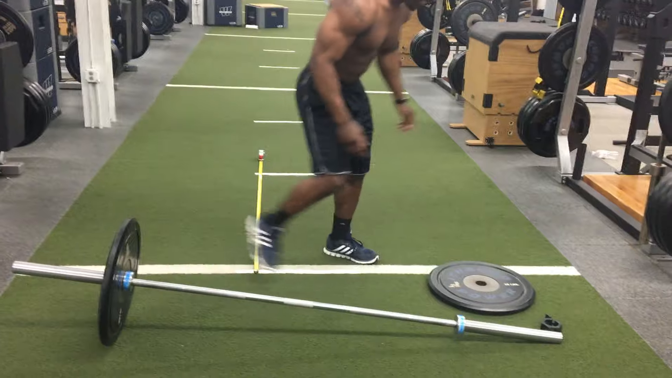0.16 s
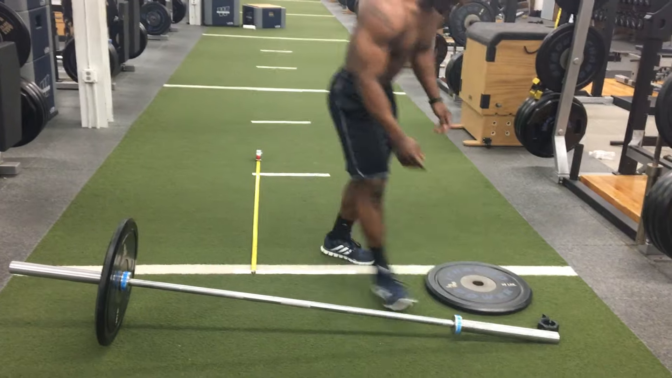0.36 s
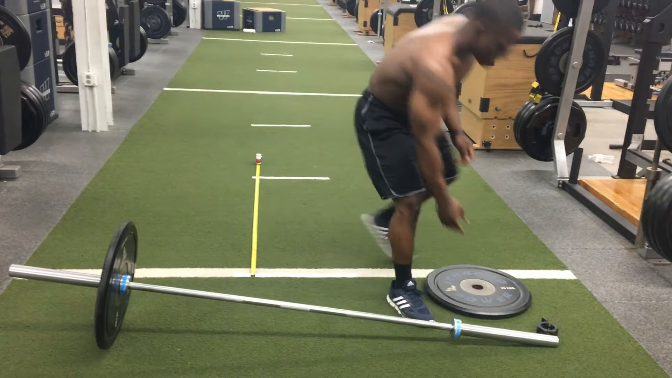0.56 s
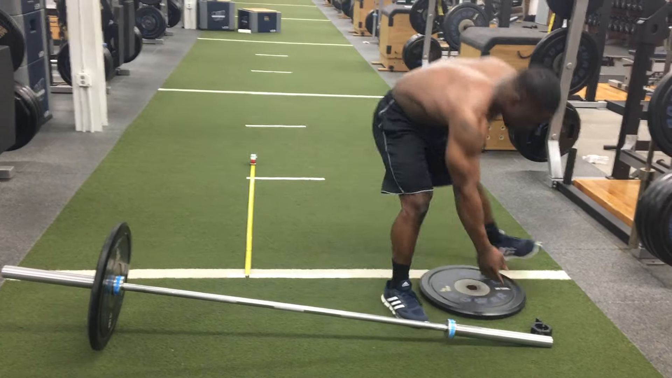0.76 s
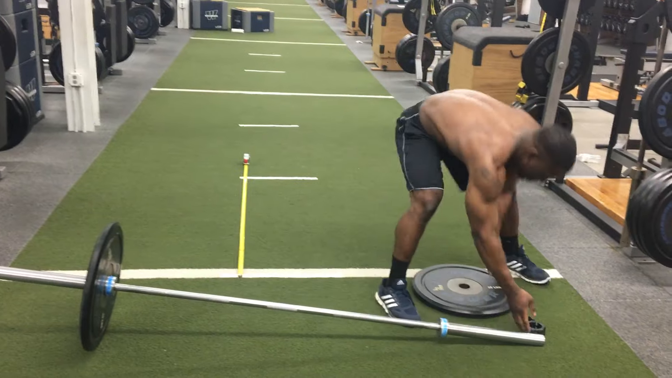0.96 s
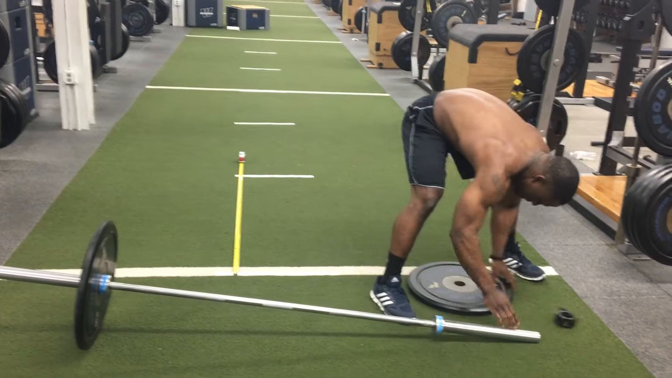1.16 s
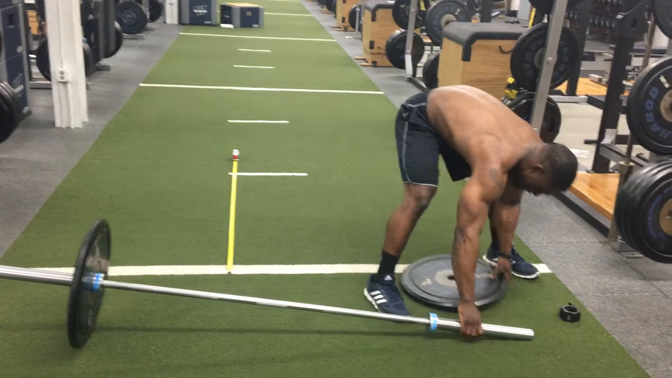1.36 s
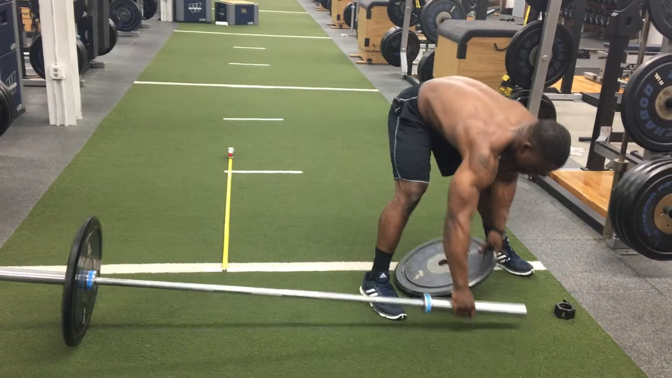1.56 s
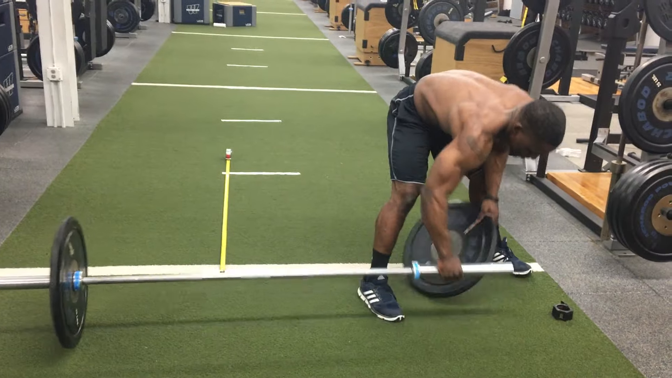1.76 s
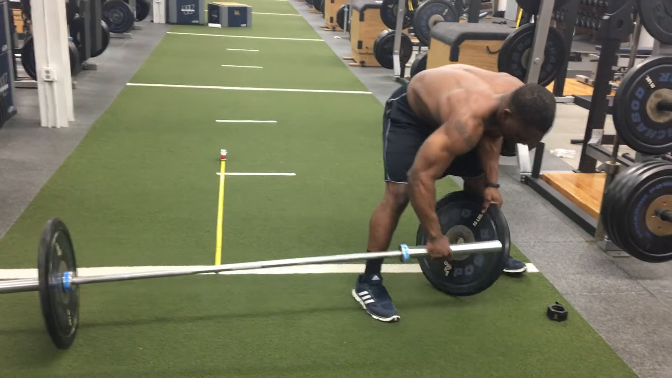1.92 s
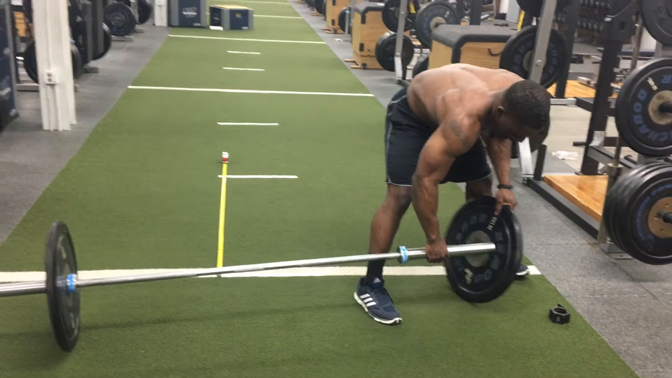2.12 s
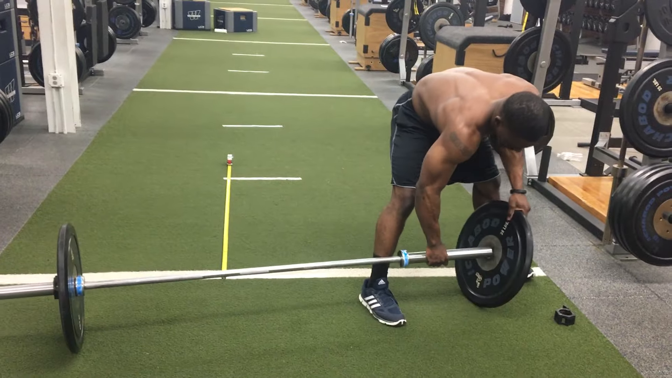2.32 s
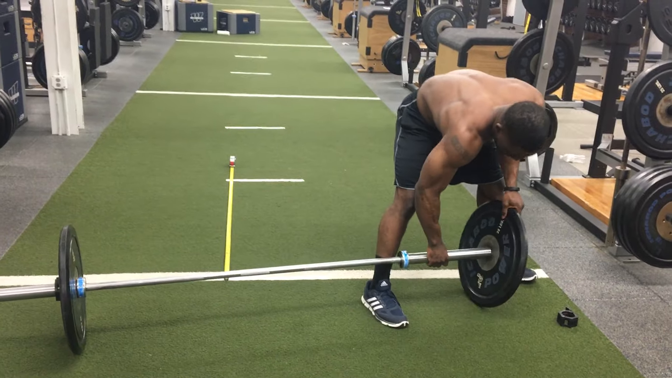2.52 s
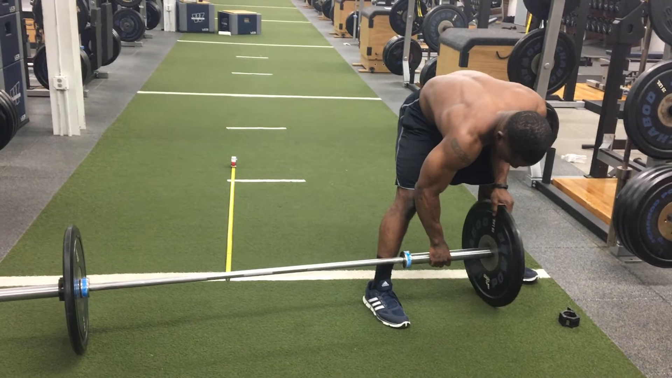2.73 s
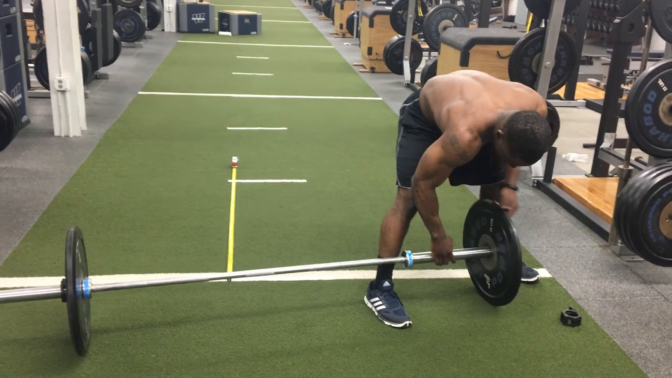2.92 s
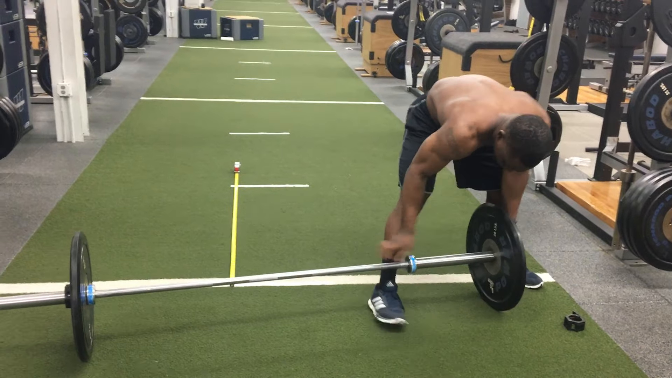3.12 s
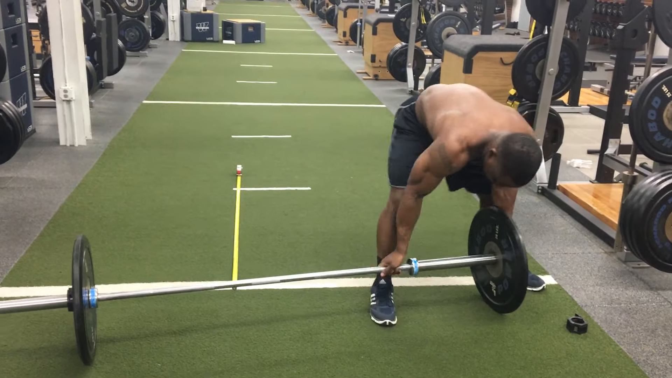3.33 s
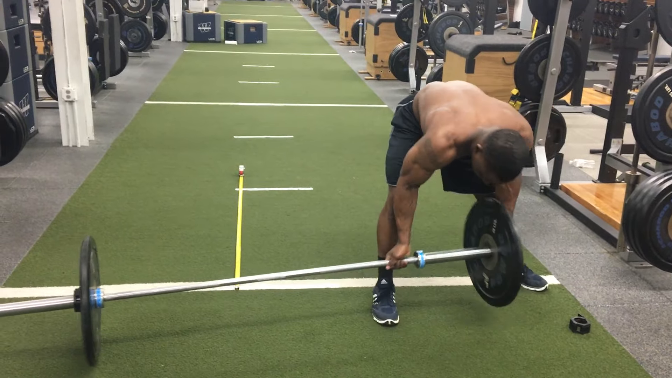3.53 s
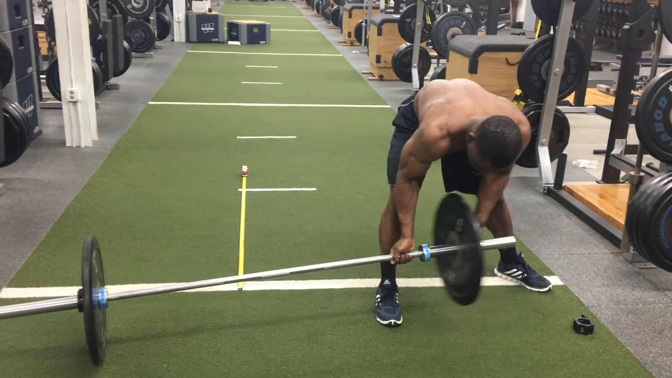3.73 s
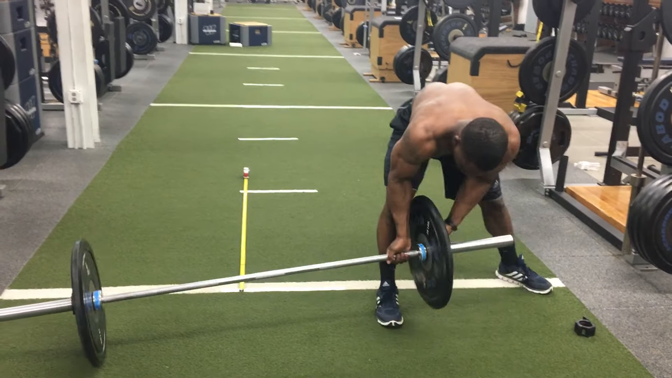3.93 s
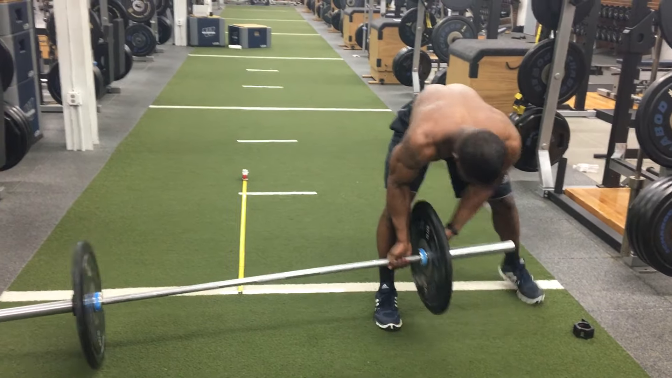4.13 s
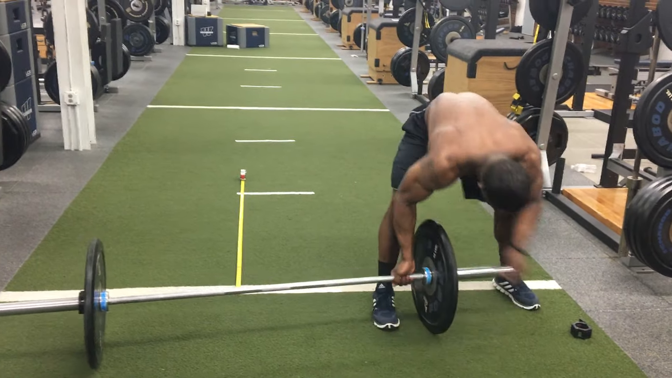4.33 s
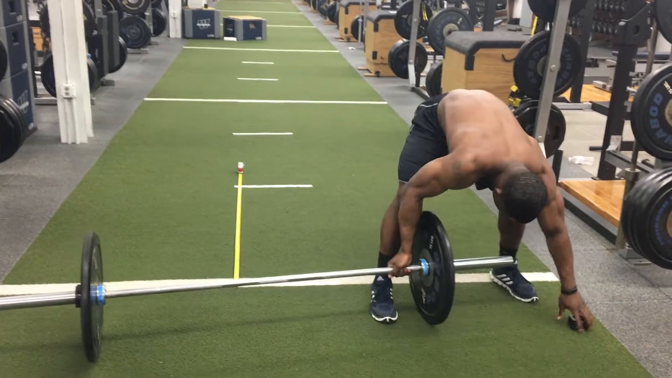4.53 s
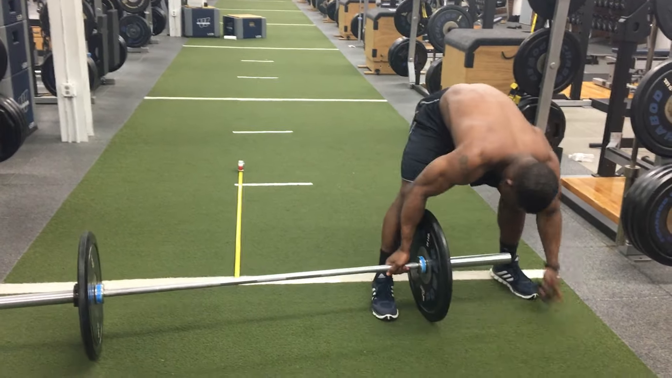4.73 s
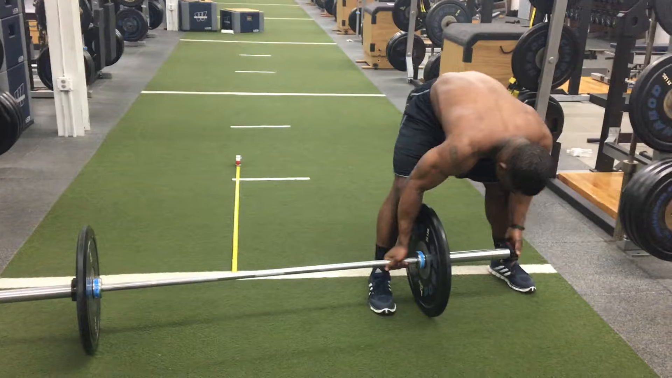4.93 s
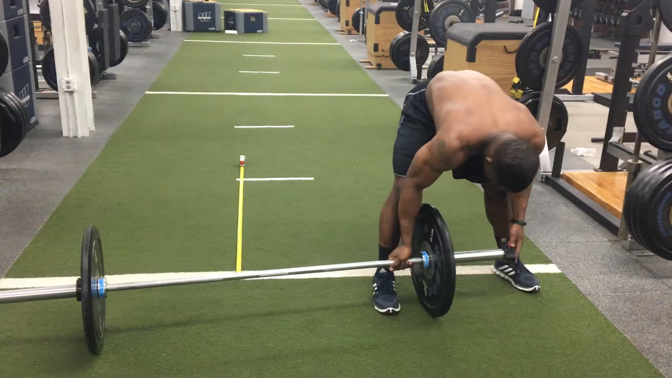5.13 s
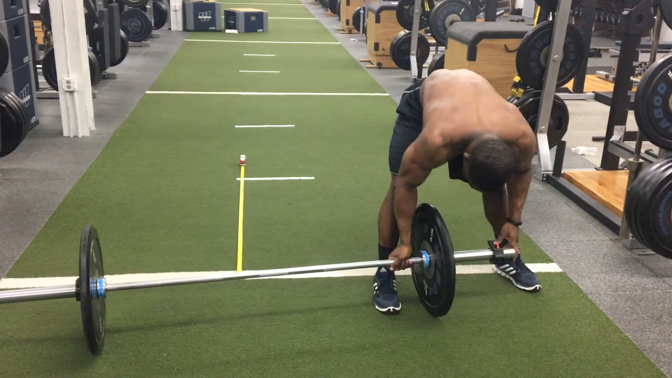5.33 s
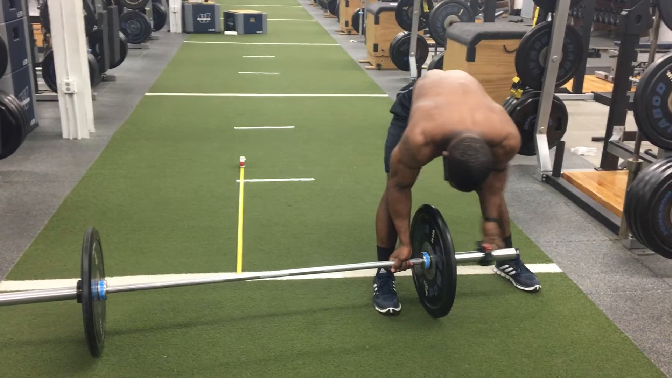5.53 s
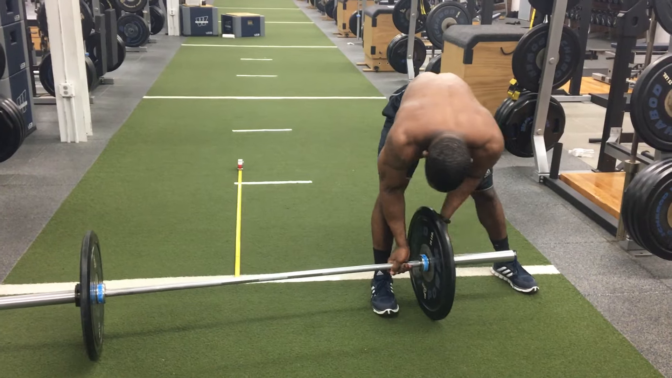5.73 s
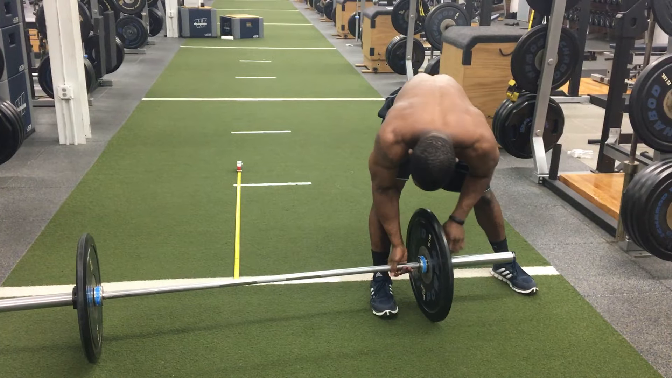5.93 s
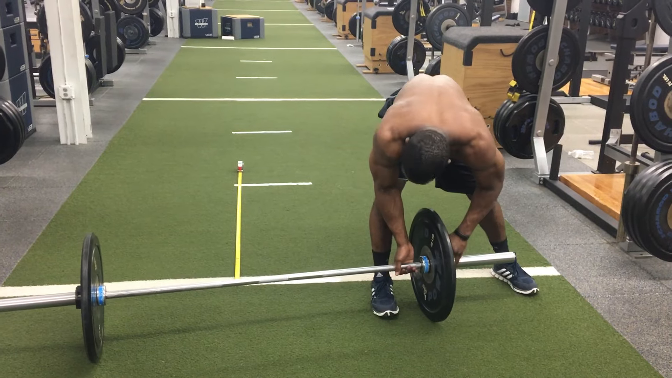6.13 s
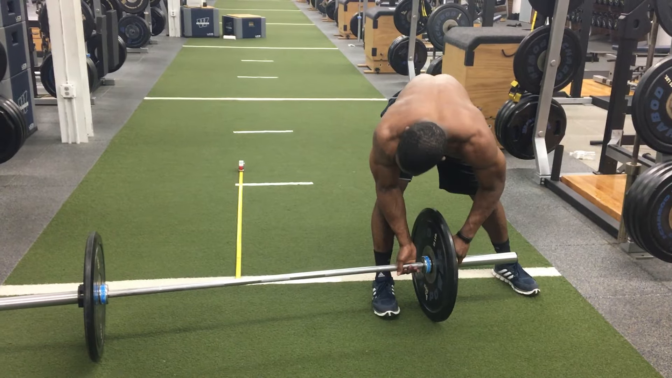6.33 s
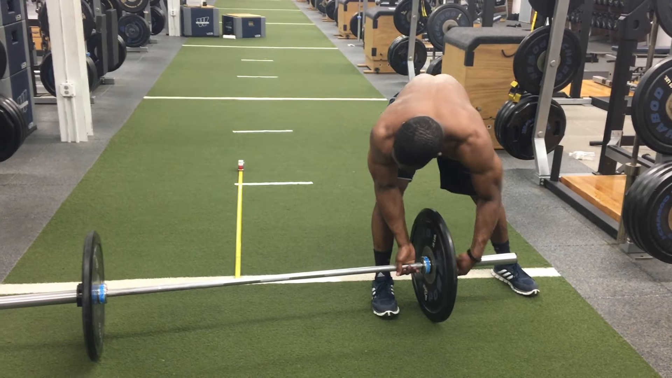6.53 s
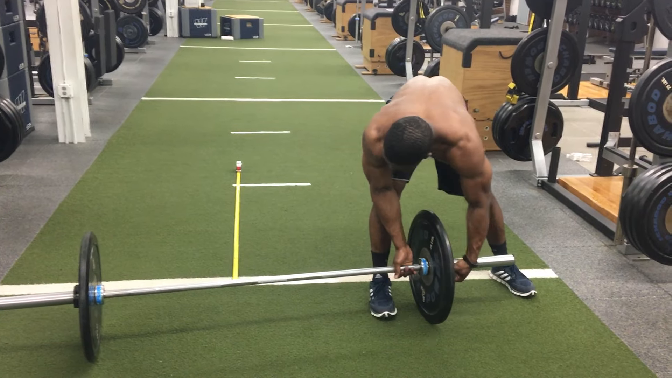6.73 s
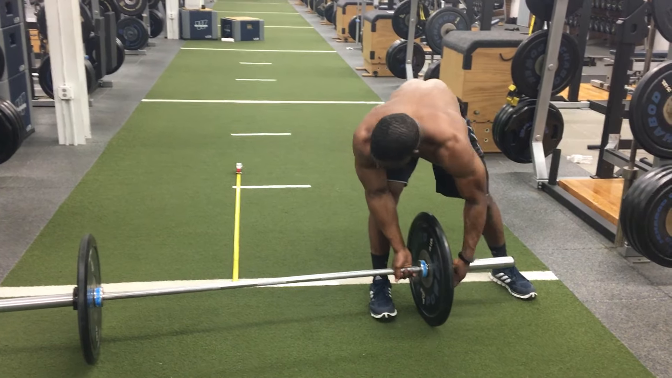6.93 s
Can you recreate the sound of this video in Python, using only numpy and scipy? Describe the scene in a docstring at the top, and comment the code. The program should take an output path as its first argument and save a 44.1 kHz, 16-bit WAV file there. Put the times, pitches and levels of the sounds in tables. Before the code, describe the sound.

Metal clanks and a brief squeal as a rubber plate slides onto a barbell, followed by plastic clicks in an echoing, humming gym.

```python
"""In a large gym with humming ventilation, a rubber weight plate is loaded on a steel barbell.
Its steel hub (the centre ring) knocks on the sleeve (the end of the bar), squeaks along it and slams
into the shoulder that stops it. Each blow cracks, rings the steel and thuds through the rubber.
A plastic collar then ticks onto the sleeve, slides up to the plate and is snapped shut.
The hall echoes these sounds."""
import sys
import numpy as np
from scipy import signal
from scipy.fft import rfft, irfft
from scipy.io import wavfile
from scipy.ndimage import uniform_filter1d

SR = 44100
rng = np.random.default_rng(int(sys.argv[2]) if len(sys.argv) > 2 else 0)


def file_out(sig):
    """Save sig as 16-bit WAV at sys.argv[1]."""
    # one column per channel
    cols = np.atleast_2d(sig).T
    # limit, then scale
    lim = np.clip(cols, -1, 1)
    pcm = np.round(lim * 32767).astype(np.int16)
    wavfile.write(sys.argv[1], SR, pcm)


N = 311434
T = np.arange(SR) / SR  # one second of sample times
PATHS = 3  # directions in which a blow spreads into the hall


def hub_slams():
    """The hub slams into the shoulder of the bar and bounces once."""
    # blows: start_s, level_db, brightness_hz, decay_s, thud_db, ring_db
    blows = [(3.9517, -15.5, 9000, .005, -6, -6), (3.9555, -16.5, 11000, .005, -7, -7),
             (4.0402, -28, 7000, .006, -8, 4.5)]
    # tone of the contact: frequency_hz, level_db
    colour = [(30, -76), (80, -3), (200, 0.5), (450, -6.5), (800, -3), (1350, 4.5), (2400, -3.5),
              (4300, -4), (6800, -6.5), (7800, -4.5), (10500, -12), (16000, -15)]
    # steel notes with the plate pushed home: pitch_hz, level_db, ring_s
    notes = [(1370, -10, .015), (1900, -6, .025), (2218, -13, .025), (3040, 4, .024), (4125, -13, .03),
             (4325, -13, .03), (5140, -13, .05), (5720, -12, .03), (6110, -14, .04), (7670, -14, .05),
             (7820, -16, .04), (8450, -20, .05), (10300, -24, .05)]
    return plate_blows(blows, colour, notes)


def hub_knocks():
    """The hub knocks on the sleeve; the rubber and the gripping hand soon stop the ringing."""
    # blows: start_s, level_db, brightness_hz, decay_s, thud_db, ring_db
    blows = [(2.2895, -26.5, 1570, 0.0018, -4.5, -15.5), (2.4425, -25.5, 2100, 0.0016, -16, -12),
             (2.4528, -28.5, 7500, 0.0058, -0.5, -2), (2.7475, -33, 1160, 0.0053, 3, -13),
             (2.7907, -37, 5030, 0.0076, -10, -11.5), (2.8376, -36.5, 8000, 0.0073, -16, -3),
             (2.889, -35.5, 3500, .0068, -6, -22), (2.9268, -41.5, 5860, 0.0035, -21, -6),
             (3.5435, -34, 11000, 0.004, -4.5, 2), (4.4275, -31.5, 5000, 0.015, -6, -12),
             (4.49, -34.5, 5470, 0.014, -3, -12)]
    # tone of the contact: frequency_hz, level_db
    colour = [(30, -63), (100, -39), (450, -12), (780, -8.5), (1000, -2), (1750, -4.5), (2200, -2.5),
              (2900, -3.5), (3400, -3.5), (5200, -12), (9000, -16.5), (16000, -24)]
    # steel notes of the sleeve: pitch_hz, level_db, ring_s
    notes = [(1809, -4, .03), (2471, -3, .04), (2724, -4, .04), (2900, 2, .04), (3914, -7, .04),
             (4350, -2, .04), (5150, -1, .08), (5280, -2, .08), (5645, -6, .04), (6115, -9, .05),
             (7100, -15, .05), (7617, -16, .07), (8155, -14, .05), (10050, -21, .06)]
    return plate_blows(blows, colour, notes)


def plate_blows(blows, colour, steel_notes):
    """Each blow makes a crack, a rubber thud and a steel ring, each leaving along its own path."""
    # low notes of the rubber: pitch_hz, level_db, ring_s
    rubber_notes = [(143, 2, 0.018), (224.4, 0, 0.036)]
    out = np.zeros((PATHS, N))
    for k, (start_s, db, bright_hz, decay_s, thud_db, ring_db) in enumerate(blows):
        add(out[k % PATHS], start_s, amp(db) * crack(colour, bright_hz, decay_s))
        add(out[(k + 1) % PATHS], start_s, amp(db + thud_db) * ring(rubber_notes))
        add(out[(k + 2) % PATHS], start_s, amp(db + ring_db) * ring(steel_notes))
    return out


def crack(colour, bright_hz, decay_s, size=4096):
    """Two surfaces chatter for a moment as they meet; a softer contact has less treble."""
    hz = abs(np.fft.fftfreq(size, 1 / SR))
    age = T[:size] / decay_s
    chatter = np.fft.fft(rng.standard_normal(size) * np.exp(-age) * (1 - np.exp(-age / 0.22)))
    chatter /= np.sqrt(uniform_filter1d(abs(chatter) ** 2, size=64, mode="wrap"))  # even out the tone
    log_gain = np.log(amp(read(colour, hz)) / np.sqrt(1 + (hz / bright_hz) ** 4))
    tone_filter = np.exp(np.conj(signal.hilbert(log_gain)))  # no sound comes before the hit
    fade = np.cos(np.linspace(0, np.pi / 2, size)) ** 2
    return unit_blow(np.fft.ifft(chatter * tone_filter).real * fade)


def ring(notes):
    """Notes fade by 60 dB in ring_s; each blow lands elsewhere and mixes them a little differently."""
    hz, db, ring_s = np.transpose(notes)[:, :, None]
    size = amp(db + rng.standard_normal(hz.shape))
    size[1::2] *= -1  # neighbouring notes swing against each other
    swing = np.sin(2 * np.pi * hz * T) * (1 - np.exp(-2 * hz * T))  # swells within a cycle
    return unit_blow((size * np.exp(-np.log(1000) * T / ring_s) * swing).sum(0))


def hub_squawk():
    """The hub breaks loose with one squawk."""
    # slip: peak_s, level_db, rise_s, fall_s
    slips = [(3.530, -15.5, 0.0018, 0.0042)]
    return squeak(slips, top_hz=1799, sag=0.019, harmonics_db=[-20.5, -2.5, -13.5, -28, -35, -49],
                  jitter=.022, flutter_db=1)


def hub_squeals():
    """The hub squeals in spurts along the sleeve."""
    # slips: peak_s, level_db, rise_s, fall_s
    slips = [(3.679, -23.5, 0.0038, 0.0045), (3.708, -41.5, 0.005, 0.032), (3.778, -47, .012, 0.039),
             (3.949, -48, .003, .002)]
    return squeak(slips, top_hz=5440, sag=0.0083, harmonics_db=[0, -27], jitter=.013, flutter_db=3)


def squeak(slips, top_hz, sag, harmonics_db, jitter, flutter_db):
    """Slipping steel squeaks; as the slip weakens, the pitch drops by up to the fraction sag."""
    strength = swells(slips)
    hz = top_hz * (1 - sag * (1 - strength / strength.max()))
    return strength * stick_slip(hz, harmonics_db, jitter, flutter_db)


def stick_slip(hz, harmonics_db, jitter, flutter_db):
    """Rapid sticking and slipping on steel makes a tone of unsteady pitch and strength."""
    cycles = np.cumsum(hz * (1 + jitter * wander(len(hz), rate_hz=900))) / SR
    tone = sum(amp(db) * np.sin(2 * np.pi * k * cycles) for k, db in enumerate(harmonics_db, 1))
    return unit_rms(tone) * amp(flutter_db * wander(len(hz), rate_hz=150))


def collar_clicks():
    """The plastic collar ticks against the sleeve and the plate."""
    # clicks: start_s, level_db, brightness_hz
    clicks = [(5.001, -42, 8500), (5.0088, -39.5, 10600), (5.0583, -44.5, 4300), (5.2294, -45, 16000),
              (5.2748, -46, 8600), (5.3337, -49, 5900), (5.4249, -53.5, 7000), (5.7775, -32.5, 9100),
              (5.7815, -30.5, 10100), (5.7858, -28, 12300), (5.7888, -24.5, 11200), (6.1722, -52, 8000)]
    # tone of the plastic: frequency_hz, level_db
    colour = [(100, 1), (500, -12), (1700, -1), (2800, 0), (4200, 2), (5200, 0), (7300, 2), (11000, -2),
              (16000, -4)]
    return plastic_clicks(clicks, colour, decay_s=0.0025)


def collar_latch():
    """The collar's lever snaps shut."""
    # clicks: start_s, level_db, brightness_hz
    clicks = [(6.861, -38, 7000), (6.8647, -33.5, 7000)]
    # tone of the lever: frequency_hz, level_db
    colour = [(200, -18), (1800, -5.5), (2800, 1.5), (4300, 0), (5000, -6), (6800, 6), (8500, -6.5),
              (16000, -11)]
    return plastic_clicks(clicks, colour, decay_s=0.0011)


def plastic_clicks(clicks, colour, decay_s):
    """Plastic clicks without ringing; the clicks take the paths in turn."""
    out = np.zeros((PATHS, N))
    for k, (start_s, db, bright_hz) in enumerate(clicks):
        add(out[k % PATHS], start_s, amp(db) * crack(colour, bright_hz, decay_s))
    return out


def hub_rub(judder_db=4, grit_db=4):
    """Each shove drags steel over steel with a gritty hiss."""
    # tone of the hiss: frequency_hz, level_db
    colour = [(300, 2), (1500, 18), (3000, 4), (4300, 9), (5300, -6), (7000, -7), (14000, -12),
              (16000, -22)]
    # shoves: peak_s, level_db, rise_s, fall_s
    shoves = [(3.29, -55, .07, 0.1), (3.55, -45.5, 0.018, 0.1), (3.68, -52, 0.044, 0.045),
              (3.84, -52.5, 0.019, 0.12)]
    hiss = noise(colour) * swells(shoves)
    return hiss * amp(judder_db * wander(N, rate_hz=200) + grit_db * wander(N, rate_hz=1800))


def whistles():
    """Light sliding contact whistles faintly; the pitch glides with the speed."""
    # the hub twice, then the collar: start_s, length_s, first_pitch_hz, last_pitch_hz, level_db
    glides = [(3.685, .035, 14500, 13600, -60), (3.74, .15, 9500, 10100, -66),
              (5.675, 0.13, 6200, 10000, -66)]
    out = np.zeros(N)
    for start_s, length_s, first_hz, last_hz, db in glides:
        progress = np.arange(0, length_s, 1 / SR) / length_s
        hz = first_hz * (last_hz / first_hz) ** progress
        tone = stick_slip(hz, harmonics_db=[0], jitter=.028, flutter_db=5.5)
        add(out, start_s, amp(db) * np.sin(np.pi * progress) * tone)
    return out


def soft_floor(x, delay_s=.003, echo_db=-7, dull_hz=4000):
    """The soft floor adds one dull echo just after the direct sound."""
    out = x.copy()
    echo = amp(echo_db) * signal.lfilter(*signal.butter(1, dull_hz, fs=SR), x)
    add(out, delay_s, echo)
    return out


def hall(x, build_s=0.0064, early_s=0.062):
    """Nearby racks scatter the sound first; then each frequency dies away at its own speed."""
    # tone of the echo: frequency_hz, level_db
    colour = [(80, -2), (220, 1), (450, 10), (1200, -2), (3000, -0.5), (6000, -4.5), (10000, -3.5),
              (16000, 1.5)]
    # time the echo takes to fade by 60 dB: frequency_hz, fade_s
    fade_times = [(100, 1.7), (220, 2.64), (500, 1.18), (1300, 1.91), (2800, 1.4), (5000, 0.88),
                  (8000, 0.68), (15000, 0.24)]
    t = np.arange(2 * SR) / SR
    echoes = rng.standard_normal(len(t)) * (rng.random(len(t)) < 5000 / SR)  # about 5000 a second
    hz, frame_s, bands = signal.stft(echoes, SR, nperseg=256)
    fade = np.exp(-np.log(1000) * frame_s / read(fade_times, hz)[:, None])
    bands = bands * amp(read(colour, hz))[:, None] * fade
    tail = signal.istft(bands, SR, nperseg=256)[1][:len(t)]
    tail *= (1 - np.exp(-t / build_s)) * (1 + np.exp(-t / early_s))  # builds up, strongest early on
    return signal.fftconvolve(x, tail / np.linalg.norm(tail))[:N]


def ventilation(waver=0.064, drift_hz=0.81):
    """Air rushes, the ducts rumble and the fan motors hum unsteadily."""
    # motor hum: pitch_hz, level_db
    motor_notes = [(119.9, -46.5), (164, -68), (240, -57), (285, -65.5), (327, -66.5)]
    # tone of the rushing air: frequency_hz, level_db
    air = [(150, -25), (270, 2), (480, -2), (700, 1), (1100, -0.5), (2000, -2), (3000, -7), (4100, -11),
           (5500, -16), (7700, -24), (10500, -28), (16000, -32.5)]
    # tone of the duct rumble: frequency_hz, level_db
    duct = [(20, -50), (36, -26), (43, 6), (49, -1), (56, -4.5), (72, -8.5), (100, -3.5), (130, -9),
            (200, -14), (300, -19), (600, -57)]
    hum = np.zeros(N)
    for hz, db in motor_notes:
        strength = amp(db) * (1 + waver * wander(N, rate_hz=14))
        pitch_hz = hz + drift_hz * wander(N, rate_hz=3.156)
        hum += strength * np.sin(2 * np.pi * np.cumsum(pitch_hz) / SR)
    return np.sqrt(2) * hum + amp(-49.5) * noise(air) + amp(-51) * noise(duct)


def swells(slips):
    """Strength of sliding: each slip grows to its peak and dies away."""
    t = np.arange(N) / SR
    strength = np.zeros(N)
    for peak_s, db, rise_s, fall_s in slips:
        from_peak = np.maximum((peak_s - t) / rise_s, (t - peak_s) / fall_s)
        strength += amp(db) * np.exp(-np.minimum(from_peak, 100))
    return strength


def noise(colour):
    """Steady noise with the given tone colour."""
    gain = amp(read(colour, np.fft.rfftfreq(N, 1 / SR)))
    return unit_rms(irfft(rfft(rng.standard_normal(N)) * gain, N))


def wander(count, rate_hz):
    """A random drift of about size 1."""
    points = rng.standard_normal(16384)
    return np.interp(np.arange(count) * rate_hz / SR, np.arange(len(points)), points)


def amp(db):
    """Turns decibels into a gain."""
    return 10 ** (np.asarray(db) / 20)


def unit_rms(x):
    """Scales a lasting sound to an average (rms) level of 1."""
    return x / np.sqrt(np.mean(x ** 2) + 1e-20)


def unit_blow(x):
    """Scales a blow to the energy of 10 ms at level 1."""
    return x * np.sqrt(SR / 100 / (np.sum(x ** 2) + 1e-20))


def read(points, hz):
    """Reads between a table's rows on a log-frequency scale."""
    row_hz, value = np.transpose(points)
    return np.interp(np.log(hz + 1), np.log(row_hz + 1), value)


def add(mix, start_s, sound):
    """Adds a sound to the mix at start_s."""
    part = mix[round(start_s * SR):][:len(sound)]
    part += sound[:len(part)]


def scene():
    """Plate and collar sound over the ventilation; every path into the hall echoes differently."""
    knocks = hub_knocks()
    slams = hub_slams()
    friction = hub_squawk() + hub_squeals() + whistles() + hub_rub()
    clicks = collar_clicks()
    latch = collar_latch()
    to_hall = amp(-5.5) * knocks + amp(-4) * slams + amp(-5) * clicks + amp(-7.5) * latch
    to_hall[0] += amp(-11) * friction
    direct = soft_floor((knocks + slams + clicks + latch).sum(0)) + friction
    return (direct + sum(hall(path) for path in to_hall) + ventilation())[None]


def record(dry, ceiling=.8, top_hz=16020):
    """The microphone rounds off the hardest peaks; then the highest treble is cut."""
    rounded = ceiling * np.tanh(dry / ceiling)
    treble_cut = signal.firwin(401, top_hz, window=("kaiser", 9), fs=SR)
    return signal.oaconvolve(rounded, treble_cut[None], "same")


dry = scene()
out = record(dry)
file_out(out)
```